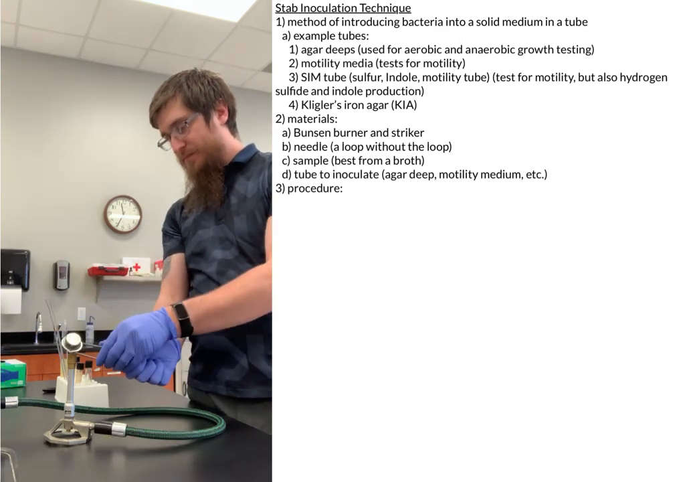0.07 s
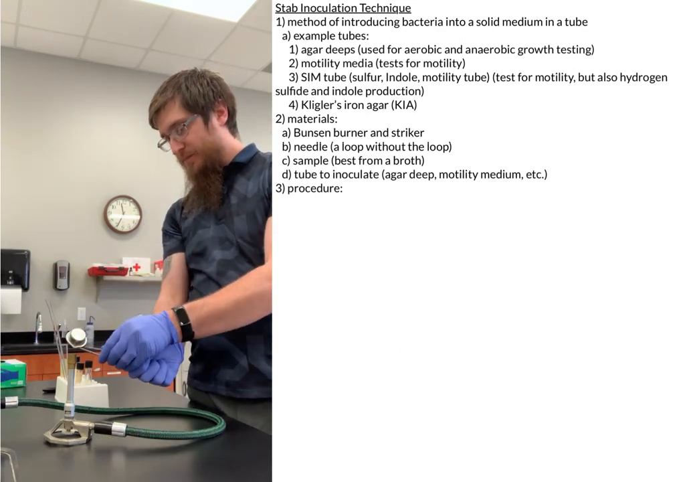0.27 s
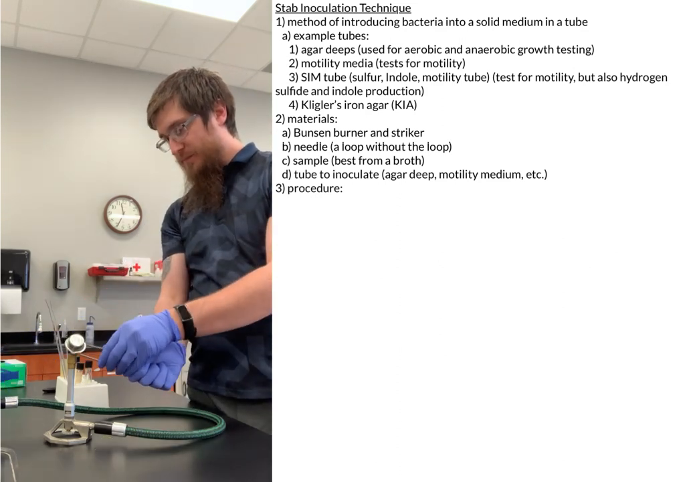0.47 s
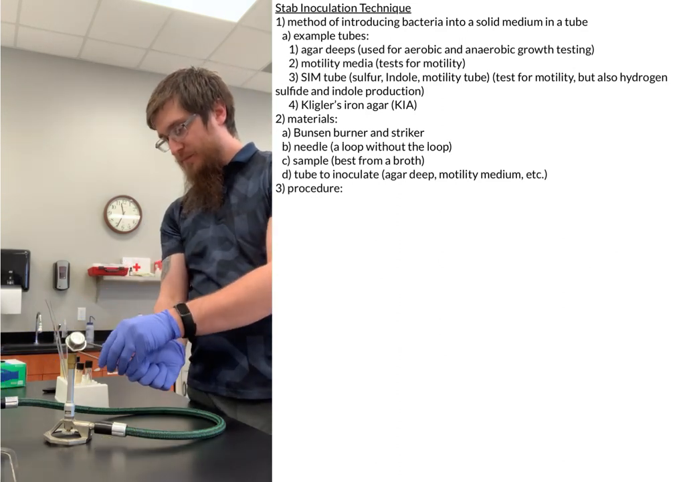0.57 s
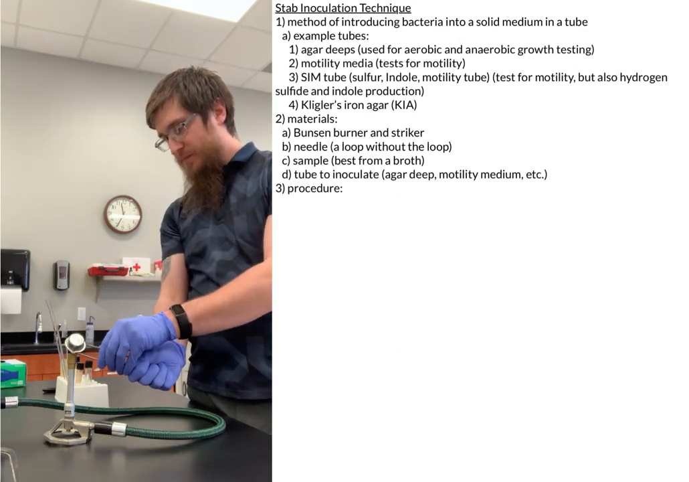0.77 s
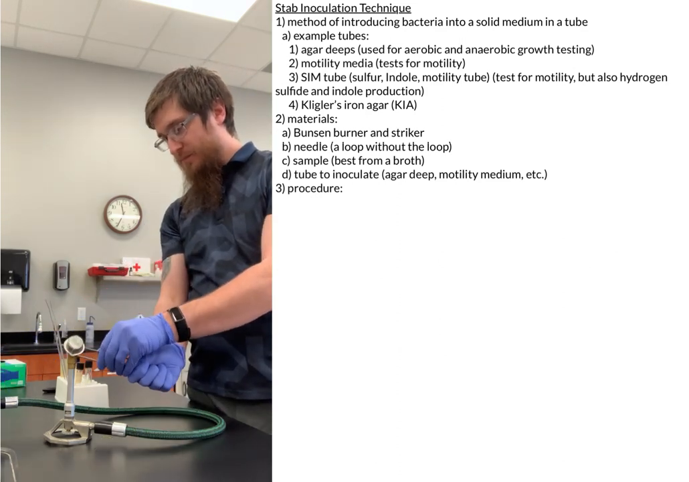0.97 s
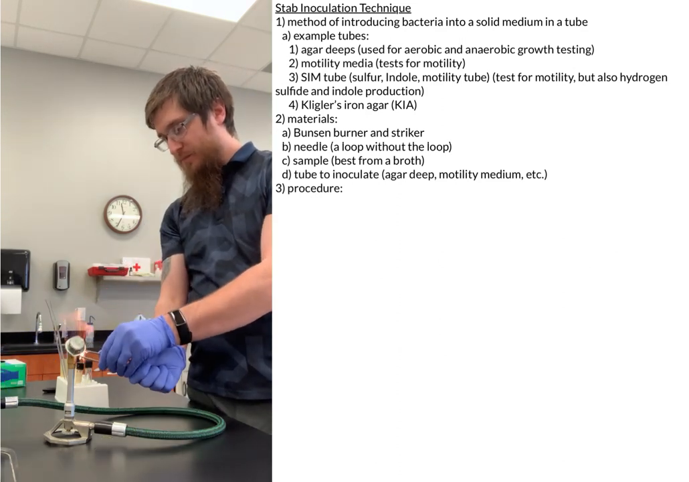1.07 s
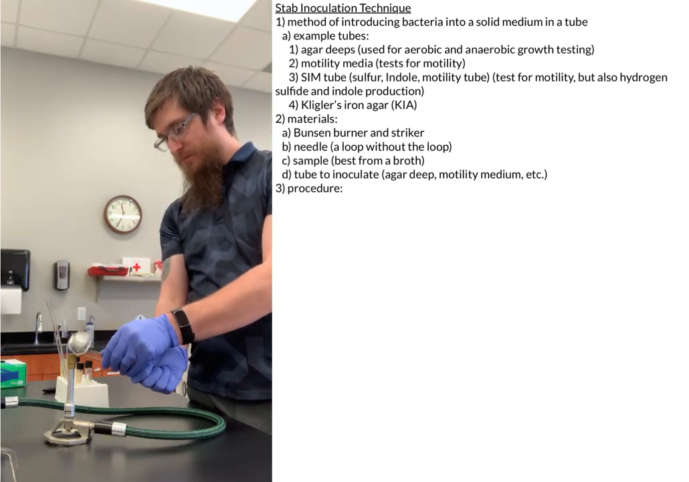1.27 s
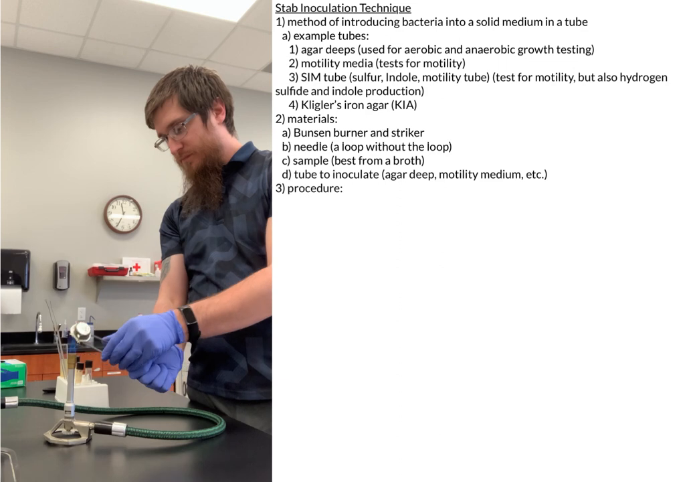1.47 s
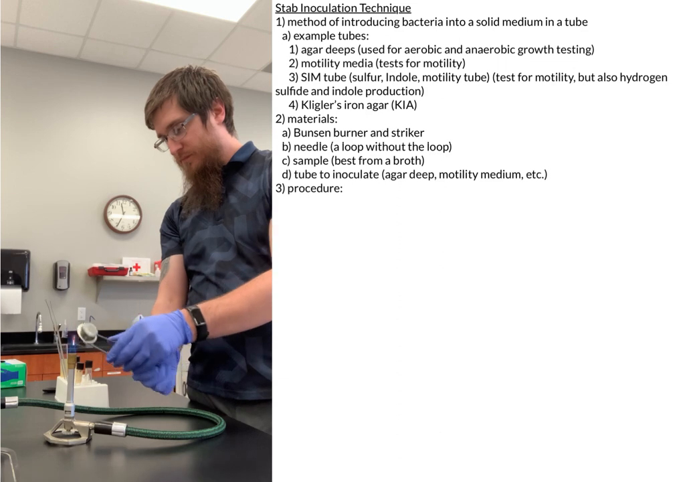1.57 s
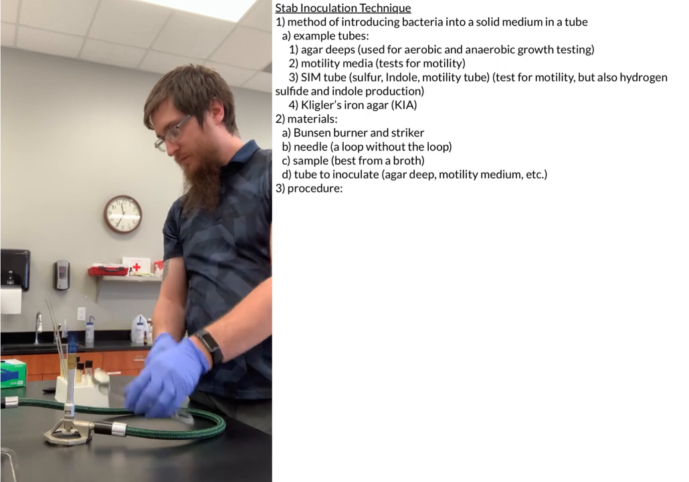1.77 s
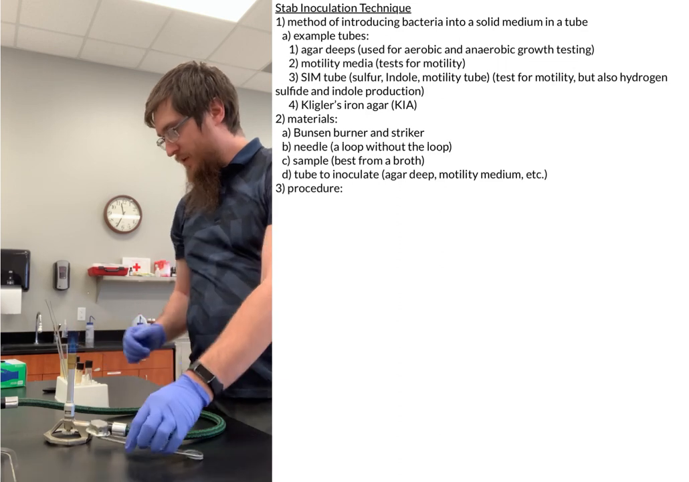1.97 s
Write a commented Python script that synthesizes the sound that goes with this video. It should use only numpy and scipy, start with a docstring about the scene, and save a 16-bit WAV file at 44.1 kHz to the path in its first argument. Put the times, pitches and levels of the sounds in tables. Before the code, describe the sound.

A flint striker rasps and clicks brightly in a hard-walled lab, close and slightly left; around the middle the gas catches with a low thump and flutters softly, followed by more snaps over ventilation rumble.

```python
"""Ventilation rumbles and hums and a gas jet hisses throughout: filtered noise. From 0.14 s a flint snaps
and scrapes along a steel file in a tin cup, left of centre: bursts and uneven ticks that ring metal modes.
A hard room answers with echoes and a diffuse tail. At 1.05 s the gas lights with a falling thump, a boom
and a low ring, and the flame flutters on as dense dispersed pops over faint hiss; the last snap and
scrape come at 2.01 s."""
import sys
import numpy as np
from scipy import signal
from scipy.fft import rfft, irfft
from scipy.io import wavfile
from scipy.ndimage import uniform_filter1d, minimum_filter1d

SR = 44100
rng = np.random.default_rng(int(sys.argv[2]) if len(sys.argv) > 2 else 0)


def to_wav(sig):
    """Store sig (one row per channel, or 1-D mono) as 16-bit WAV at the path in sys.argv[1].

    Samples outside -1..1 are clipped; the rate is SR.
    """
    pcm = np.clip(np.atleast_2d(sig), -1, 1) * 32767
    pcm = np.round(pcm).astype(np.int16)
    wavfile.write(sys.argv[1], SR, pcm.T)  # frames by channels


def linear_from_db(decibels):
    """Turn decibels (scalar or array-like) into linear amplitude factors; 0 gives 1."""
    return 10 ** (np.asarray(decibels, float) / 20)


N = 89170
SIDES = np.array([[1], [-1]])  # left, right


def colour(x, rows):
    """Zero-phase filter from (Hz, dB) points, interpolated over log frequency."""
    points_hz, points_db = np.array(rows, float).T
    hz = np.fft.rfftfreq(x.shape[-1], 1 / SR) + 1
    gain_db = np.interp(np.log(hz), np.log(points_hz), points_db)
    return irfft(rfft(x) * linear_from_db(gain_db), x.shape[-1])


def level(x, db):
    """Scales x to an rms in dB."""
    return x * linear_from_db(db) / np.sqrt(np.mean(x ** 2))


def air():
    """Steady turbulence: ventilation rumble and narrow hums below, gas-jet hiss above."""
    # Noise spectrum of the steady air. Each row: frequency in # Hz, relative density in dB per Hz.
    spectrum = [(12, -34), (20, -5), (43, -1.5), (131, -11.5), (212, -21.5), (332, -26), (382, -49),
                (428, -52), (670, -75), (1320, -66), (2510, -48), (5520, -38.5), (6500, -50), (10200, -43),
                (12500, -18), (13900, -41), (15200, -36), (16500, -51)]
    # Stereo width. Each row: frequency in Hz, side over mid in dB.
    width_curve = [(60, -24), (110, -12.5), (200, -6), (380, -1), (700, 27), (1290, 22), (2380, 2),
                   (4400, -1), (8120, -3), (15000, -4)]
    # Ventilation hums. Each row: frequency in Hz, bandwidth in Hz, rms in dB.
    hum_rows = [(59.5, 3.7, -64), (1624, 52, -85)]
    mid_db = -57
    mid, side = colour(rng.standard_normal((2, N)), spectrum)
    side = colour(side, width_curve)
    hums = 0
    for hz, width_hz, db in hum_rows:
        b, a = signal.iirpeak(hz, hz / width_hz, SR)
        hums = hums + level(signal.lfilter(b, a, rng.standard_normal(N)), db)
    return hums + linear_from_db(mid_db) / np.std(mid) * (mid + side * SIDES)


def curve(rows, at_s, col=1):
    """Linear interpolation of one column over the first."""
    rows = np.array(rows, float)
    return np.interp(at_s, rows[:, 0], rows[:, col])


def walk(rate_hz, size):
    """Slewed random levels, spread near 1."""
    k = max(int(SR / rate_hz), 1)
    held = np.repeat(rng.standard_normal(size // k + 1), k)
    return 0.83 * uniform_filter1d(held, k)[:size]


def ring(modes, favoured_hz):
    """Unit-energy metal response at two ports; a contact favours modes near one pitch and its overtone."""
    favour_db, favour_octaves, overtone_ratio = 14, 0.1, 1.92
    detune_share, mode_scatter_db = 0.003, 1.5  # grip and contact detune the modes
    port_scatter_db, port_lag_s, rise_s = 4, 0.00003, 0.00027
    hz, db, t60_s = np.array(modes, float).T[:, :, None]
    t = np.arange(4096) / SR
    mode_draw, port_draw, phase_draw, detune_draw = rng.standard_normal((4, len(modes), 1))
    hz = hz * (1 + detune_share * detune_draw)
    for ratio in (1, overtone_ratio):
        octaves_off = np.log2(hz / (favoured_hz * ratio))
        # both lobes act on the detuned modes
        db = db + favour_db * np.exp(-(octaves_off / favour_octaves) ** 2)
    sign = (-1.) ** np.arange(len(modes))[:, None]  # neighbours in opposite phase
    envelope = sign * (1 - np.exp(-t / rise_s)) * linear_from_db(-60 * t / t60_s)
    ports = []
    for s in (1, -1):
        gain = linear_from_db(db + mode_scatter_db * mode_draw + s * port_scatter_db / 2 * port_draw) / np.sqrt(t60_s)
        phase = 2 * np.pi * hz * (t + s * port_lag_s / 2) + (1 - s) * phase_draw / 2
        ports.append((gain * envelope * np.sin(phase)).sum(0))
    ports = np.array(ports)
    return ports / np.sqrt(np.mean((ports ** 2).sum(1)))


def add(out, start_s, force, low_db, high_db, low_hz, high_hz, lean_db):
    """One contact force rings the lower and upper modes of cup and file; lean is left over right."""
    # Modes of cup and file. Each row: frequency in Hz, relative level in dB, t60 in seconds.
    lower_modes = [(840, -25, 0.053), (1050, -25, 0.005), (1464, -14.5, 0.0047), (1636, -23, 0.027),
                   (2264, -16.5, 0.0047), (2850, -10, 0.016), (3350, -6, 0.0031), (3690, -5, 0.014),
                   (4000, -6, 0.0041), (4700, -2, 0.0037), (5200, -4, 0.014), (5360, -7, 0.012)]
    upper_modes = [(7260, -10, 0.0053), (7874, -7.5, 0.0059), (8700, -6.5, 0.011), (10170, -5.5, 0.0016),
                   (10750, -3.5, 0.04), (11180, 4.5, 0.0016), (12100, -8, 0.005), (12940, -2.5, 0.018),
                   (13600, -2.5, 0.013), (14300, -2, 0.0032), (14940, -3, 0.0027), (14740, -5, 0.0044)]
    low = signal.fftconvolve((force * linear_from_db(low_db))[None], ring(lower_modes, low_hz))
    high = signal.fftconvolve((force * linear_from_db(high_db))[None], ring(upper_modes, high_hz))
    i = int(start_s * SR)
    y = (low + high)[:, :N - i] * linear_from_db(SIDES * lean_db / 2)
    out[:, i:i + y.shape[1]] += y


def striker():
    """Flint on file: scrapes are dense uneven ticks over the teeth, snaps short bursts as it jumps a tooth."""
    # Scrapes, one table a stroke. Each row: time in seconds, drive of lower modes in dB, of upper modes in dB.
    scrapes = [
        [(0.162, -38, -50), (0.168, -33, -33.5), (0.182, -42, -33.5), (0.222, -66, -49)],
        [(0.466, -45, -60), (0.477, -54, -54), (0.484, -27.5, -21), (0.5, -26, -10.5)],
        [(1.463, -47, -36), (1.469, -28, -21.5), (1.494, -29.5, -30)],
        [(2.0075, -25.5, -34.5), (2.012, -28.5, -23.5), (2.0215, -44, -38)],
    ]
    # Strokes. Each row: favoured lower Hz, favoured upper Hz, lean to the left in dB.
    strokes = [(4750, 11550, 0.5), (5360, 10750, 1.5), (2850, 12740, 2.5), (4380, 12500, 4)]
    # Snaps. Each row: start in seconds, relative drive of lower modes in dB, of upper modes in dB,
    # force t60 in seconds, favoured lower Hz, favoured upper Hz.
    snaps = [(0.1354, -47, -44, 0.0089, 3970, 8300), (0.1674, -33.5, -34, 0.051, 4750, 8270),
             (0.182, -59, -13, 0.0027, 4000, 13600), (0.196, -31, -21, 0.016, 4700, 14300),
             (0.2007, -28, -25, 0.012, 3870, 8700), (0.2092, -36, -28, 0.015, 3970, 12400),
             (0.2244, -28, -28.5, 0.0061, 3984, 8700), (.2275, -39, -6, 0.0028, 4700, 14300),
             (0.479, -20, -21, 0.023, 2970, 14300), (.4999, -26, 7, 0.0042, 5200, 12500),
             (.92, -30.5, -22, 0.013, 4700, 10750), (0.9573, -27, -13.5, 0.0052, 3720, 10750),
             (.958, -35.5, -29.5, 0.024, 1050, 10750), (0.97, -32.5, -20, 0.0086, 4700, 12700),
             (0.993, -44, -24, 0.0072, 4520, 8400), (1.0235, -14, -3, 0.0094, 4700, 10390),
             (1.0278, -22.5, -12.5, 0.015, 4700, 12800), (1.3091, -9.5, -6, 0.01, 5135, 10550),
             (1.314, -7, 10, 0.0033, 4870, 13860), (1.4708, -9.5, -14, 0.0049, 2850, 13000),
             (1.4885, -15, -40, 0.0033, 2850, 10900), (1.4949, -36, 6, 0.004, 5360, 12900),
             (2.0078, -27.5, -23, 0.023, 1606, 12100)]
    teeth_per_s, teeth_scatter_db, patchy_db, patchy_hz = 5500, 2.5, -0.5, 404
    snap_rise_s, snap_gain_db, snap_lean_db = 0.00087, 6.5, 4.5
    low_cut_hz = 450
    out = np.zeros((2, N))
    for rows, stroke in zip(scrapes, strokes):
        t = np.arange(rows[0][0], rows[-1][0], 1 / SR)
        hit, polarity, size = rng.random((3, 4000))[:, :len(t)]
        ticks = (hit < teeth_per_s / SR) * np.sign(polarity - 0.5) * linear_from_db(-teeth_scatter_db * np.log(size))
        patches = linear_from_db(patchy_db * walk(patchy_hz, 4000)[:len(t)])
        force = level(ticks * patches, 0)
        add(out, t[0], force, curve(rows, t), curve(rows, t, col=2), *stroke)
    t = np.arange(1024) / SR
    for start_s, low_db, high_db, t60_s, low_hz, high_hz in snaps:
        envelope = (1 - np.exp(-t / snap_rise_s)) * linear_from_db(snap_gain_db - 60 * t / t60_s)
        force = np.sign(rng.standard_normal(1024)) * envelope
        add(out, start_s, force, low_db, high_db, low_hz, high_hz, snap_lean_db)
    return signal.sosfilt(signal.butter(4, low_cut_hz, "high", fs=SR, output="sos"), out)


def room(x):
    """Bench scatter at once, the walls after a gap, then a diffuse tail that fades by band."""
    # Room bands. Each row: centre in Hz, t60 in seconds, relative level in dB.
    bands = [(310, 0.64, -9), (1000, 0.32, -14.5), (2000, 0.48, -6.5), (2800, 0.96, -12), (3680, 0.92, -5),
             (4830, 0.62, -16.5), (5620, 0.98, -5), (6490, 0.17, -28), (7580, 0.63, -15.5),
             (8200, 0.71, -13), (10400, 0.27, -13), (10750, 0.51, -14.5), (13000, 0.55, -25.5),
             (15300, 0.76, -23)]
    # Clusters of strong echoes. Each row: delay in seconds, spread in seconds, boost over the tail in dB.
    echoes = [(0.012, 0.0092, 15), (0.037, 0.0086, 6)]
    first_echo_s, build_s, early_db = 0.0125, 0.002, -15
    t = np.arange(SR) / SR
    after_s = np.maximum(t - first_echo_s, 0)
    gate = linear_from_db(early_db) + 1 - np.exp(-after_s / build_s)
    for delay_s, spread_s, db in echoes:
        gate = gate * linear_from_db(db * np.exp(-((t - delay_s) / spread_s) ** 2))
    hz = np.fft.rfftfreq(SR, 1 / SR)
    centres_hz = np.array(bands)[:, 0]
    noise = rfft(rng.standard_normal((2, SR)))
    tail = 0
    for k, (_, t60_s, db) in enumerate(bands):
        share = np.interp(hz, centres_hz, np.arange(len(bands)) == k)  # triangular crossfade
        fade = linear_from_db(db - 60 * t / t60_s) / np.sqrt(t60_s * SR / 14)
        tail = tail + irfft(noise * share) * fade
    return signal.fftconvolve(x, tail * gate, axes=1)[:, :N]


def ignition(t):
    """Lighting gas: a thump of falling pitch, a slower boom and a low ring, all decaying sines."""
    thump_db, thump_hz, sag_s, thump_t60_s = -31.5, 277, 0.0301, 0.16  # pitch at onset
    boom_db, boom_hz, boom_t60_s, boom_rise_s = -29.5, 49, 0.2, 0.014
    ring_db, ring_hz, ring_t60_s = -37, 157.7, 0.33
    cycles = thump_hz * sag_s * (1 - np.exp(-t / sag_s))
    thump = -linear_from_db(thump_db - 60 * t / thump_t60_s) * np.sin(2 * np.pi * cycles)
    boom = linear_from_db(boom_db - 60 * t / boom_t60_s) * np.sin(2 * np.pi * boom_hz * t)
    boom = boom * (1 - np.exp(-(t / boom_rise_s) ** 2))
    low_ring = linear_from_db(ring_db - 60 * t / ring_t60_s) * np.sin(2 * np.pi * ring_hz * t)
    return thump - boom + low_ring


def flame():
    """After ignition, random small pops, treble first and bass late, flutter over a faint hiss."""
    # Loud pops. Each row: time in seconds, pulse height in dB before a common 2 dB boost.
    loud_pops = [(1.048, 10), (1.063, 20.5), (1.154, 8.5), (1.267, 14), (1.349, 15.5), (1.372, 13.5),
                 (1.555, 10.5), (1.59, 17), (1.697, 8)]
    # Flutter spectrum. Each row: frequency in Hz, relative density in dB per Hz.
    spectrum = [(53, -37), (90, -1.5), (160, -1), (330, -8.5), (677, -11.5), (1050, -10.5), (1800, -31),
                (2340, -24.5), (3960, -120)]
    lit_s, flare_db, flare_fade_s = 1.047, 21, 0.013
    pops_per_s, pop_scatter_db, bass_delay_s, bend_hz = 600, 2, 0.00563, 400
    mid_db, side_db, lean_db, hiss_db = -53, -12.5, -1, -64  # side against mid, left over right
    t = np.maximum(np.arange(N) / SR - lit_s, 0)
    lit = t > 0
    hit, polarity, size = rng.random((2, 3, N)).transpose(1, 0, 2)
    pops = (hit < pops_per_s / SR) * np.sign(polarity - 0.5) * linear_from_db(-pop_scatter_db * np.log(size + 1e-9))
    pops = pops * lit * linear_from_db(flare_db * np.exp(-t / flare_fade_s))
    for s, db in loud_pops:
        pops[0, int(s * SR)] = linear_from_db(db + 2)
    hz = np.fft.rfftfreq(N, 1 / SR) + 1
    # group delay = bass_delay_s / (1 + hz / bend_hz)
    dispersion = np.exp(-2j * np.pi * bass_delay_s * bend_hz * np.log(1 + hz / bend_hz))
    mid, side = colour(irfft(rfft(pops) * dispersion, N), spectrum)
    gain = linear_from_db(mid_db) / np.std(mid[-N // 5:])  # level set on the settled flame
    flutter = lit * gain * (mid + linear_from_db(side_db) * side * SIDES)
    hiss_band = signal.butter(2, (1610, 7700), "band", fs=SR, output="sos")
    hiss = level(signal.sosfilt(hiss_band, rng.standard_normal((2, N))), hiss_db)
    return (ignition(t) + flutter) * linear_from_db(SIDES * lean_db / 2) + lit * hiss


def scene():
    """Direct striker and flame, their room sound, and the steady air."""
    steady, near, fire = air(), striker(), flame()
    return near + fire + room(near + linear_from_db(-4.5) * fire) + steady


def roll_off(x):
    """The treble ends steeply here."""
    return signal.sosfilt(signal.butter(12, 16670, fs=SR, output="sos"), x)


def record(dry):
    """A limiter reacts late and holds gain down briefly after peaks; both channels share the top treble."""
    threshold_db, ratio, lag_s, hold_s, smooth_s = -9.5, 10, 0.003, 0.002, 0.00025
    mono_above_hz, top_hz = 12000, 16260
    hold = int(hold_s * SR) | 1
    peak = -minimum_filter1d(-np.abs(dry).max(0), hold, origin=hold // 2)
    gain = np.minimum(1, linear_from_db(threshold_db) / peak) ** (1 - 1 / ratio)
    gain = uniform_filter1d(gain, int(smooth_s * SR) + 1)
    left, right = dry * np.roll(gain, int(lag_s * SR))
    top_filter = signal.butter(10, top_hz, fs=SR, output="sos")
    side_filter = signal.butter(8, mono_above_hz, fs=SR, output="sos")
    mid = signal.sosfiltfilt(top_filter, (left + right) / 2)
    side = signal.sosfiltfilt(side_filter, (left - right) / 2)
    return roll_off(np.array([mid + side, mid - side]))


dry = scene()
out = record(dry)
to_wav(out)
```